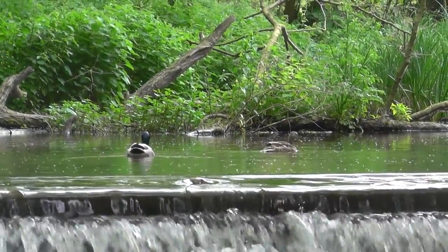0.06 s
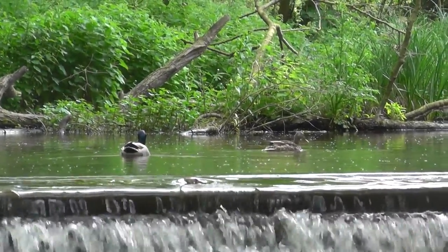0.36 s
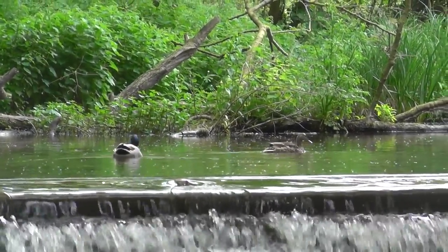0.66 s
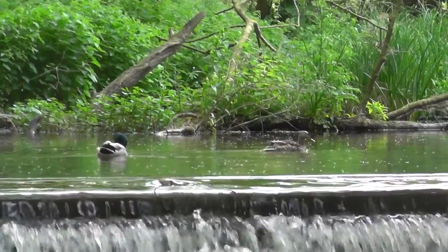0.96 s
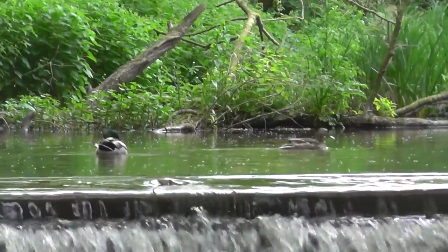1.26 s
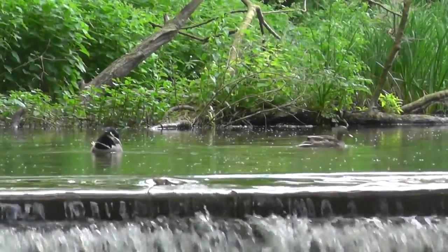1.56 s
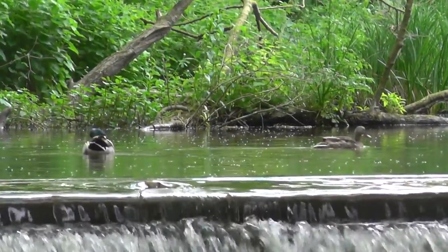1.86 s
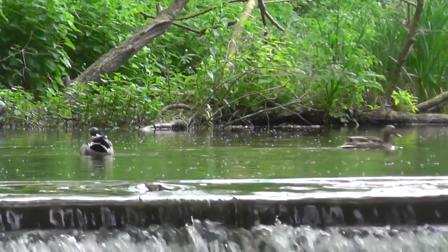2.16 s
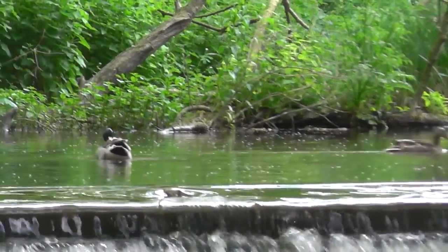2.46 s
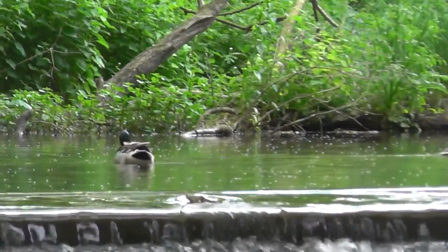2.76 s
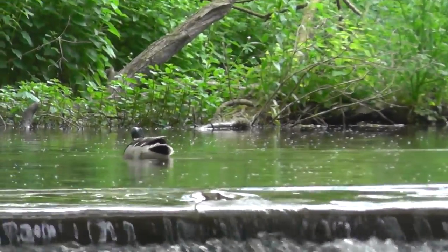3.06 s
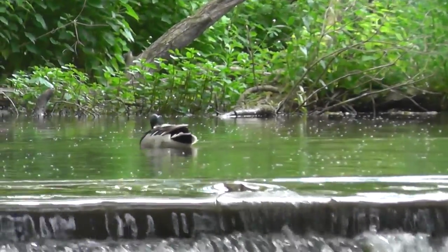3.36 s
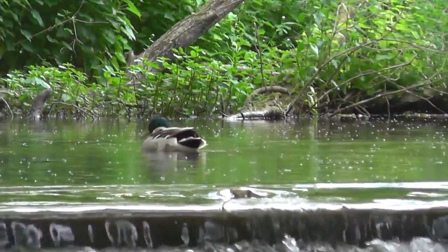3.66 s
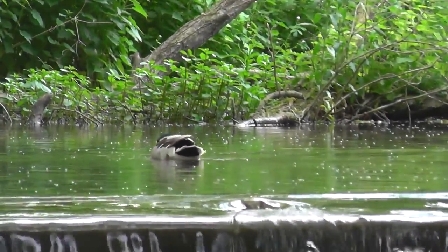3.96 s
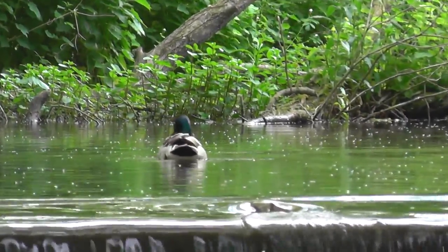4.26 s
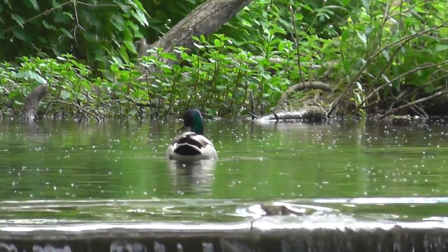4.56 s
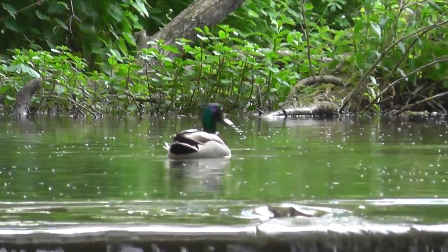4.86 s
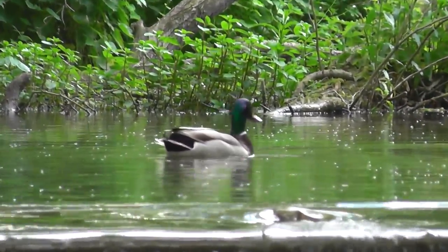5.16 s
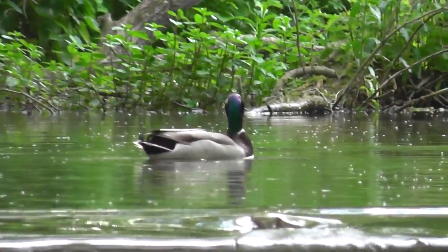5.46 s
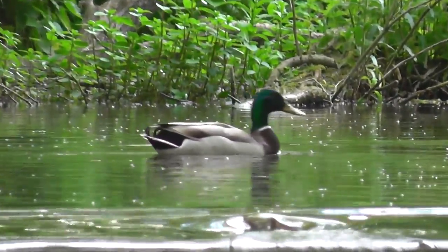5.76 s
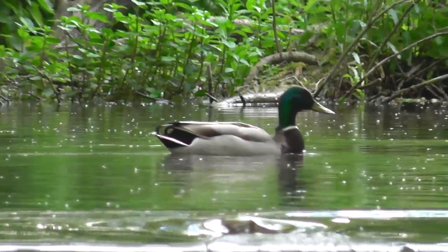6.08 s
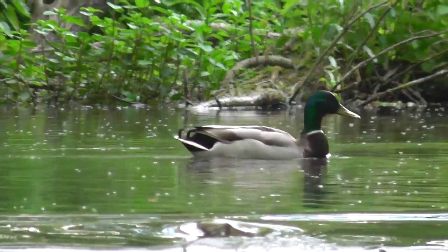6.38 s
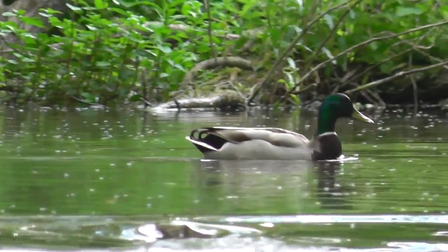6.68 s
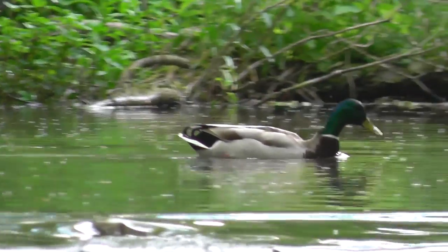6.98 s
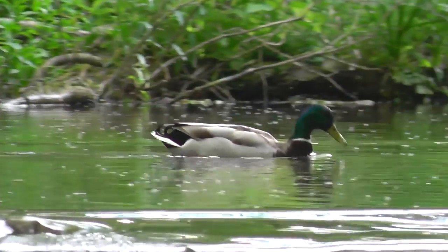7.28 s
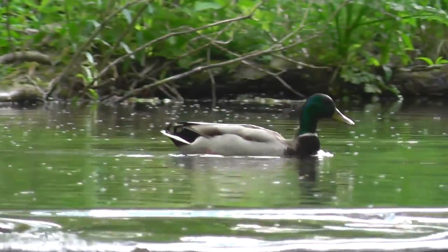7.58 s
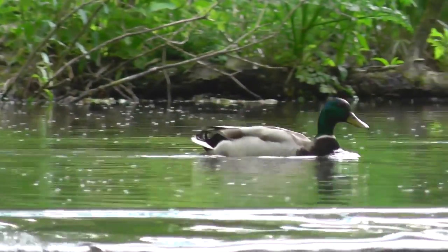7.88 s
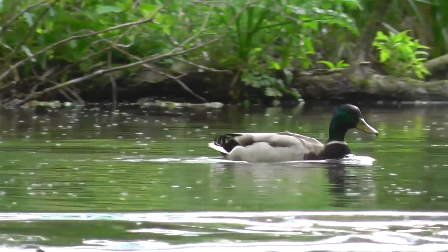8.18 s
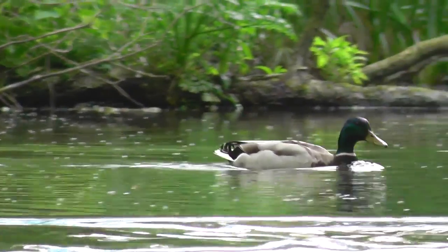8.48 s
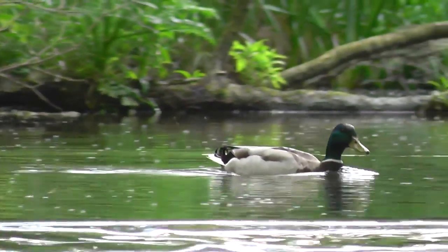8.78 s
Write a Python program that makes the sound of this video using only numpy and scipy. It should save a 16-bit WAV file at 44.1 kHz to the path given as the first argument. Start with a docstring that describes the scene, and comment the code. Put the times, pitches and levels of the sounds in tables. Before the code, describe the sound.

A river spills over a low weir and roars evenly for the whole nine seconds, heard straight ahead from the bank in near mono. A bright rush of countless small bubbles and splashes dominates. Under it are gurgling and the low drumming of water hitting the pool, while foam and spray hiss on top. A very faint deep rumble eases over the first few seconds. The roar swells slightly and briefly at about 1.2, 2.7 and 4 seconds. Between 4 and 6 seconds, a few larger air pockets make short, rising gulps, half buried in the rush. From about 3 to 6.5 seconds, the hiss grows a little brighter and the sound draws in toward the centre. More small surges come around 7, 8.5 and 9 seconds, and the water is still running at full strength at the end.

```python
"""A river spills over a low weir in a park and roars without a break.
The falling sheet of water drums air into the pool, pockets of air gurgle, a swarm of small ringing
bubbles makes the bright rush, and foam and spray hiss on top. The roar swells briefly now and then,
and a few big air pockets gulp near the middle. A small, almost mono microphone on the bank slowly
narrows its focus, so the sound grows a little brighter and draws in toward the centre."""
import sys
import numpy as np
from scipy import signal
from scipy.fft import irfft
from scipy.io import wavfile

SR = 44100
rng = np.random.default_rng(int(sys.argv[2]) if len(sys.argv) > 2 else 0)


def store_pcm(level_fs):
    """Save levels as 16-bit WAV."""
    pcm = np.round(np.clip(level_fs, -1, 1) * 32767).astype(np.int16)
    wavfile.write(sys.argv[1], SR, np.atleast_2d(pcm).T)


N = 398223


def from_db(db):
    """Turn decibels into a number to multiply by."""
    return 10 ** (np.asarray(db) / 20)


def rms_one(x):
    """Scale a signal so that its average strength (RMS) is 1."""
    return x / np.sqrt(np.mean(x ** 2) + 1e-20)


def coloured(x, colour):
    """Turn each pitch up or down along a tone curve of f/Hz, level/dB points."""
    hz, db = np.transpose(colour)
    grid_hz = np.maximum(np.fft.rfftfreq(8192, 1 / SR), 1)
    gains = from_db(np.interp(np.log(grid_hz), np.log(hz), db))
    response = np.fft.fftshift(irfft(gains))
    return signal.oaconvolve(x, response * np.hanning(len(response)), mode="same")


def churn(depth_db, rate):
    """Swirling water makes a level (dB) wander at random, about `rate` times a second."""
    hold, warm_up = 40, 2000  # samples per step, steps thrown away
    r = np.exp(-2 * np.pi * rate * hold / SR)
    noise = rng.standard_normal(N // hold + warm_up + 2)
    slow = signal.lfilter([1], [1, -2 * r, r * r], noise)[warm_up:]
    return depth_db * np.repeat(rms_one(slow), hold)[:N]


def ring(clicks, hz, cycles):
    """Each click sets a bubble ringing; it fades by 60 dB in `cycles` vibrations."""
    decay = np.exp(-np.log(1000) * hz / (cycles * SR))
    turn = 2 * np.pi * hz / SR
    return signal.lfilter([0, np.sin(turn)], [1, -2 * decay * np.cos(turn), decay ** 2], clicks + 1e-18)


def bubbles(span_hz, per_s, cycles, spread_db, clump_db, clump_rate, sizes):
    """Bubbles of several sizes are born at random; each size swells and fades in clumps of its own."""
    swarm = np.zeros(N)
    for hz in np.geomspace(*span_hz, sizes):
        when, strength, sign = rng.random((int(per_s * N / SR / sizes), 3)).T
        born = (when * N).astype(int)
        boost_db = spread_db * np.minimum(-np.log(1 - strength), 4)  # most are weak, a few strong
        pushes = from_db(boost_db + churn(clump_db, clump_rate)[born]) * np.sign(sign - .5)
        # small, high bubbles die sooner, so a harder push keeps the swarm even
        clicks = np.bincount(born, hz * pushes, N)
        swarm += ring(clicks, hz, cycles)
    return rms_one(swarm)


def water(colour, near, near_db):
    """Nearby bubbles stand out of the smooth wash of countless farther ones."""
    wash = rms_one(coloured(rng.standard_normal(N), colour))
    return rms_one(wash + from_db(near_db) * rms_one(coloured(near, colour)))


# Tone of the deep rumble: f/Hz, level/dB
RUMBLE_TONE = [(15, -42), (30, -21), (45, -15), (58, -11), (68, -5.5), (82, -4.5), (115, -2.5), (150, -6),
               (250, -50)]

def rumble(settle_s=3.5):
    """A deep rumble starts stronger and settles down."""
    level_db = -50.5 + 7 * np.exp(-np.arange(N) / SR / settle_s)
    return from_db(level_db) * rms_one(coloured(rng.standard_normal(N), RUMBLE_TONE))


# Tone of the water hitting the pool: f/Hz, level/dB
PLUNGE_TONE = [(70, -38), (125, -16.5), (165, -3.5), (212, 0.9), (268, -4), (325, -1), (410, -5.5),
               (480, -16), (700, -46)]

def plunge(focus):
    """The falling sheet drives air under, and whole clouds of bubbles throb at a low pitch."""
    clouds = bubbles((125, 480), per_s=700, cycles=14, spread_db=2, clump_db=0.5, clump_rate=10, sizes=10)
    level_db = -31 - 1.5 * focus + surge_db(hz=240) + churn(depth_db=0.56, rate=3)
    return from_db(level_db) * water(PLUNGE_TONE, clouds, near_db=-2)


# Tone of the air pockets: f/Hz, level/dB
GURGLE_TONE = [(280, -48), (420, -7), (510, -1), (590, -3), (700, 1), (790, 0.5), (860, -1), (985, 1),
               (1100, -2), (1350, -1), (1600, -14), (2200, -52)]

def gurgle():
    """Pockets of trapped air ring in the pool."""
    pockets = bubbles((400, 1550), per_s=1200, cycles=27.4, spread_db=0.5,
                      clump_db=3, clump_rate=6, sizes=16)
    level_db = -26.8 + surge_db(hz=900) + churn(depth_db=0.33, rate=4.3)
    return from_db(level_db) * water(GURGLE_TONE, pockets, near_db=1.5)


# Tones of the small bubbles (rush) and the even smaller ones (splash): f/Hz, level/dB
RUSH_TONE = [(1000, -54), (1380, -12.5), (1600, -4.5), (1820, -0.5), (2080, -1), (2380, -5.5), (2650, -16),
             (3400, -52)]
SPLASH_TONE = [(1700, -41), (2450, -2.5), (2650, -.5), (3260, 0), (3530, -5.5), (3800, -4), (4150, -7),
               (4600, -9.5), (5100, -31), (6500, -55)]

def white_water(focus):
    """Millimetre-sized bubbles ring by the thousand as the sheet breaks up in uneven slaps."""
    coarse = bubbles((1350, 2650), per_s=6000, cycles=43, spread_db=2,
                     clump_db=2.6, clump_rate=6.5, sizes=16)
    fine = bubbles((2300, 5000), per_s=10000, cycles=51, spread_db=1.5,
                   clump_db=2.5, clump_rate=7.5, sizes=22)
    rush_db = -19 + 0.5 * focus + surge_db(hz=1910) + churn(depth_db=0.47, rate=1.2)
    splash_db = -20 + 0.3 * focus + surge_db(hz=3000)
    rush = from_db(rush_db) * water(RUSH_TONE, coarse, near_db=4)
    splash = from_db(splash_db) * water(SPLASH_TONE, fine, near_db=5.5)
    return (rush + splash) * from_db(churn(depth_db=0.29, rate=20))


# Tones of the fizzing foam and the falling spray: f/Hz, level/dB
FOAM_TONE = [(3700, -40), (4700, -8), (5100, -2.5), (5480, 0), (6000, -6), (6500, -11), (7100, -18),
             (7700, -23.5), (9000, -47), (11000, -70)]
SPRAY_TONE = [(6000, -43), (7900, -12), (8500, -8), (9000, -9), (10000, -3), (10800, -0.5), (11900, -1.9),
              (13000, -8), (14200, -12), (15600, -20)]

def foam_and_spray(focus):
    """Foam fizzes as it bursts, and flung drops crackle back onto the water."""
    fizz = bubbles((4500, 8300), per_s=9000, cycles=36, spread_db=1.5,
                   clump_db=2.5, clump_rate=7.7, sizes=15)
    drops = bubbles((8000, 15000), per_s=12000, cycles=15, spread_db=2,
                    clump_db=3, clump_rate=15, sizes=6)
    foam_db = -24 + 0.5 * focus + churn(depth_db=0.5, rate=3)
    treble_db = -1.6 + 3.5 * focus + churn(depth_db=0.9, rate=2.4)
    spray_db = -33.5 + 1.24 * focus + churn(depth_db=0.4, rate=2.5)
    foam = water(FOAM_TONE, fizz, near_db=2)
    # the top of the hiss, near 6-7 kHz, grows stronger as the focus narrows and wanders a little
    treble = coloured(foam, [(5000, -43), (5700, -12), (6500, 2.5)])
    foam = from_db(foam_db) * (foam + (from_db(treble_db) - 1) * treble)
    spray = from_db(spray_db) * water(SPRAY_TONE, drops, near_db=-5)
    return (foam + spray) * from_db(churn(depth_db=0.28, rate=16))


# Tone of the stereo widening: f/Hz, level/dB
WIDENING_TONE = [(25, -9), (60, -13), (120, -13), (220, -35), (440, -14.5), (700, -22), (1300, -20),
                 (1750, -68), (3200, -70), (5000, -79), (6500, -21), (7900, -3.5), (10000, -45)]

def stereo_width(weir, focus):
    """A faint, delayed, filtered copy widens the roar; a narrow focus fades it, the bass least."""
    copy = coloured(np.roll(weir, SR // 7), WIDENING_TONE)
    bass = coloured(copy, [(580, 0), (1160, -60)])
    return from_db(1 - 15 * focus) * bass + from_db(6 - 39.5 * focus) * (copy - bass)


# Brief swells of the roar: t/s (middle), length/s, level/dB (added at its own pitch), f/Hz
SWELLS = [(1.16, 0.22, 2.3, 1100), (1.37, .22, 1.5, 1900), (1.92, 0.11, 1, 230), (2.11, 0.13, 1.3, 2600),
          (2.685, 0.11, 2, 2700), (3.992, 0.11, 3, 230), (4.85, 0.15, 1.5, 2500), (5.52, 0.32, 1.1, 1800),
          (6.31, 0.26, 1.2, 2600), (6.86, .12, 2.5, 3100), (7.0, 0.074, 3.2, 1900), (7.18, 0.16, 2, 900),
          (7.84, 0.35, 1.6, 2300), (8.55, 0.12, 2.5, 2100), (8.73, 0.085, 2, 3100), (9.02, 0.13, 4.5, 1500)]

def surge_db(hz, spread_octaves=0.45):
    """The sheet thickens and throws bubbles of about one size; gives the level this adds at `hz`."""
    t, added_db = np.arange(N) / SR, np.zeros(N)
    for middle_s, length_s, swell_db, pitch_hz in SWELLS:
        share = np.exp(-.5 * (np.log2(hz / pitch_hz) / spread_octaves) ** 2)  # less for distant pitches
        during = np.abs(t - middle_s) < 2 * length_s
        bell_curve = np.exp(-(2 * (t[during] - middle_s) / length_s) ** 2)
        added_db[during] += swell_db * share * bell_curve
    return added_db


# Single large air pockets: t/s, level/dB (peak), f/Hz (at the start)
BIG_POCKETS = [(4.12, -23, 1140), (5.038, -26, 1050), (5.12, -24, 836), (5.136, -23, 940), (5.4, -23, 320),
               (5.411, -23.5, 396), (5.6, -26, 647), (5.911, -17, 1467)]

def gulps(peak_s=0.008, rise_per_s=2.2):
    """A large air pocket swells, rings and rises in pitch on its way to the surface."""
    track, age = np.zeros(N), np.arange(SR // 5) / SR
    swell = age / peak_s * np.exp(1 - age / peak_s)
    for start_s, peak_db, hz in BIG_POCKETS:
        tone = np.sin(2 * np.pi * hz * age * (1 + rise_per_s * age / 2))
        start = int(start_s * SR)
        track[start:start + len(age)] += from_db(peak_db) * swell * tone
    return track


# How tightly the microphone aims at the weir: t/s, focus (0 wide, 1 narrow)
MIC_FOCUS = [(0, 0), (1.5, 0.063), (3, .15), (4.3, .37), (5.5, 0.85), (6.5, 1), (9.03, 1)]

def scene():
    """The whole weir lies straight ahead, so left and right hear nearly the same."""
    focus = np.interp(np.arange(N) / SR, *np.transpose(MIC_FOCUS))
    pool = rumble() + plunge(focus) + gurgle()
    weir = pool + white_water(focus) + foam_and_spray(focus) + gulps()
    width = stereo_width(weir, focus)
    return np.array([weir + width, weir - width])


def record(dry, cutoff_hz=15750):
    """The very highest hiss is cut off steeply."""
    return signal.sosfilt(signal.ellip(12, .1, 90, cutoff_hz, fs=SR, output="sos"), dry)


dry = scene()
out = record(dry)
store_pcm(out)
```